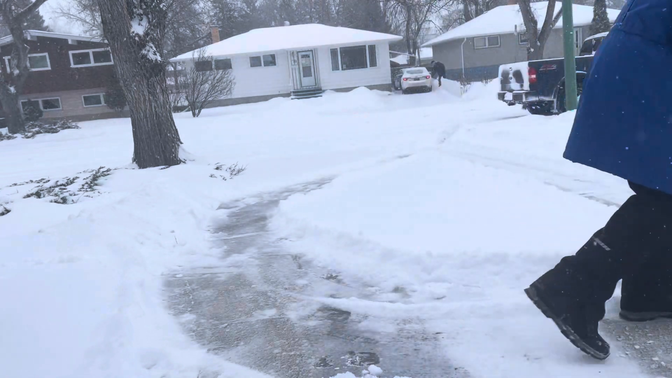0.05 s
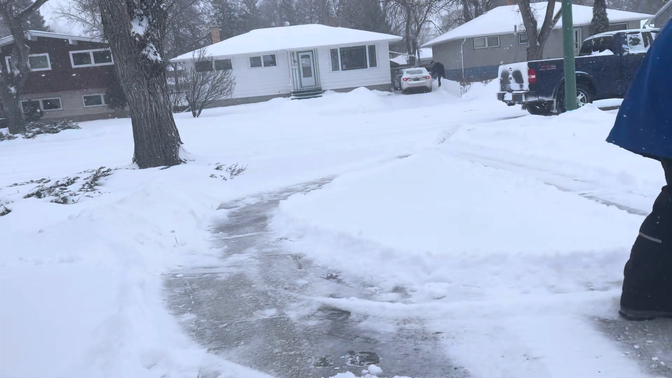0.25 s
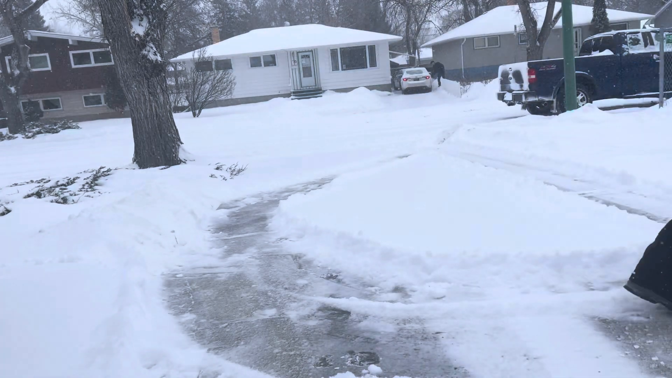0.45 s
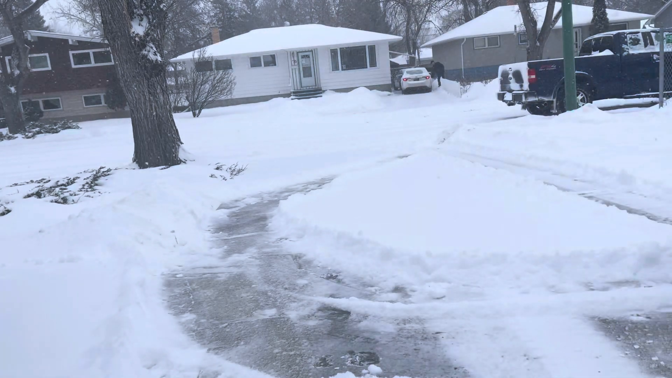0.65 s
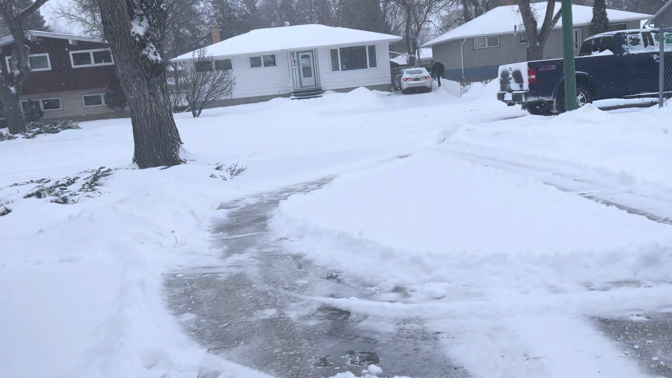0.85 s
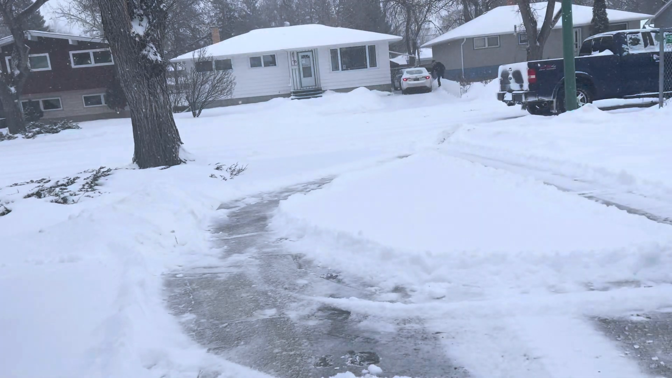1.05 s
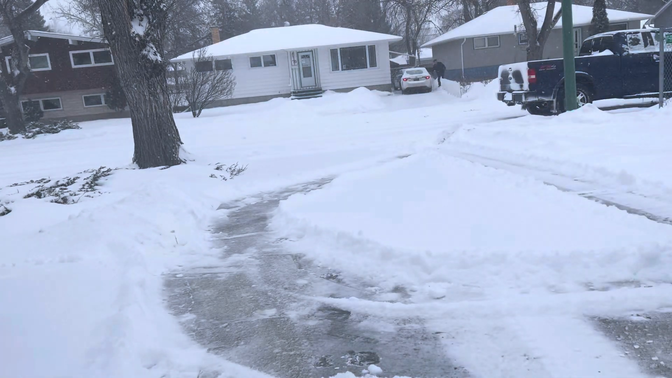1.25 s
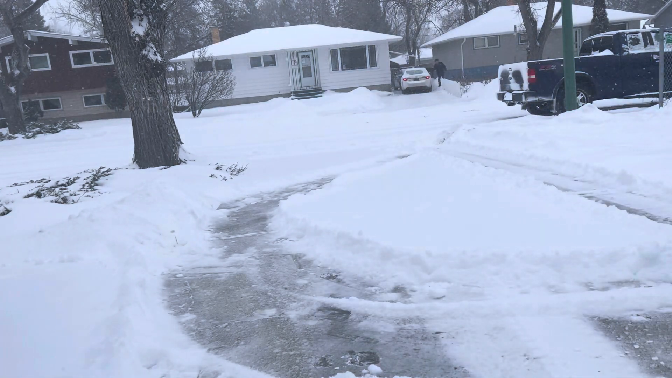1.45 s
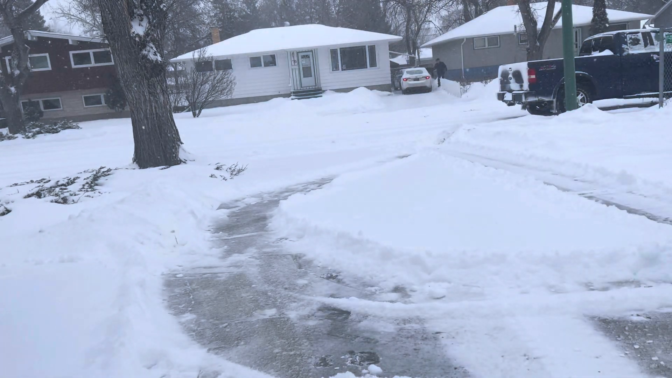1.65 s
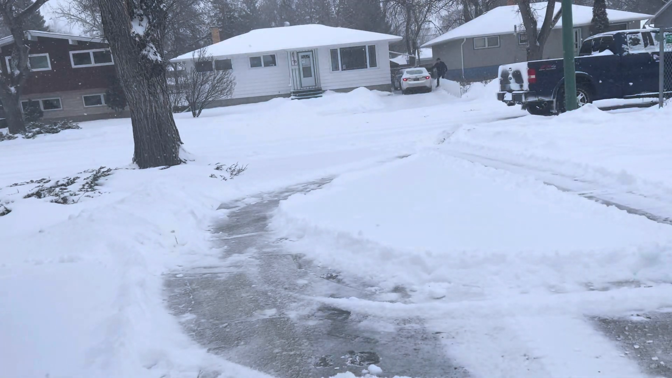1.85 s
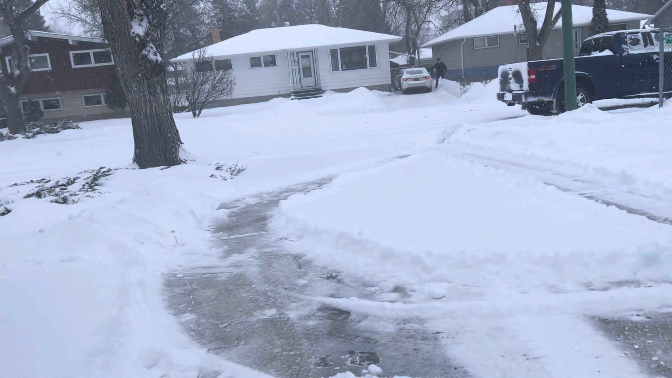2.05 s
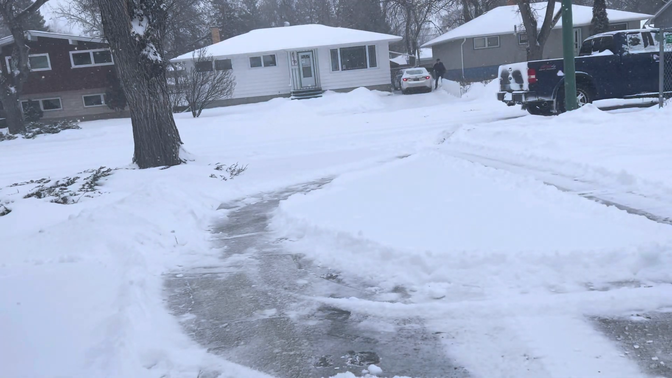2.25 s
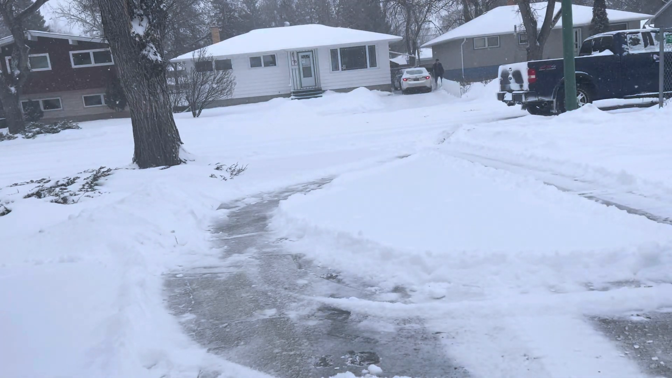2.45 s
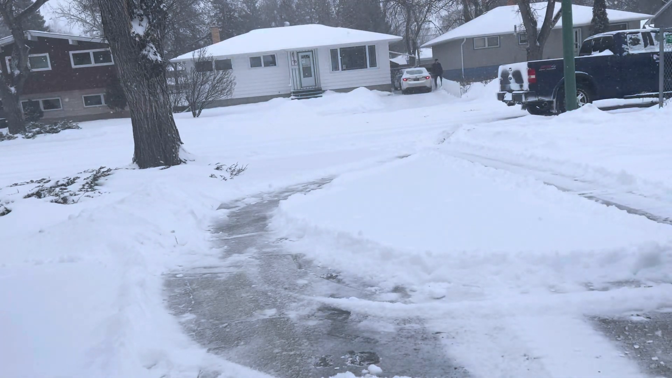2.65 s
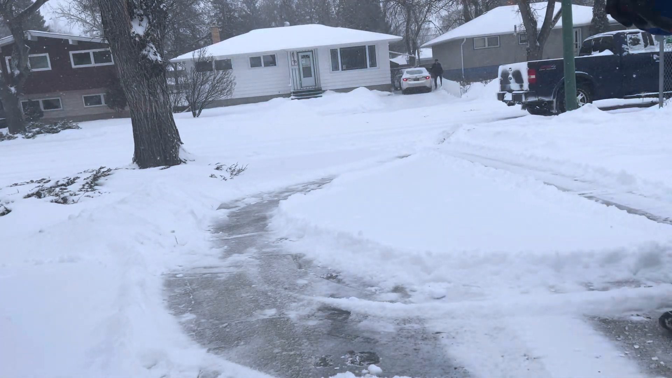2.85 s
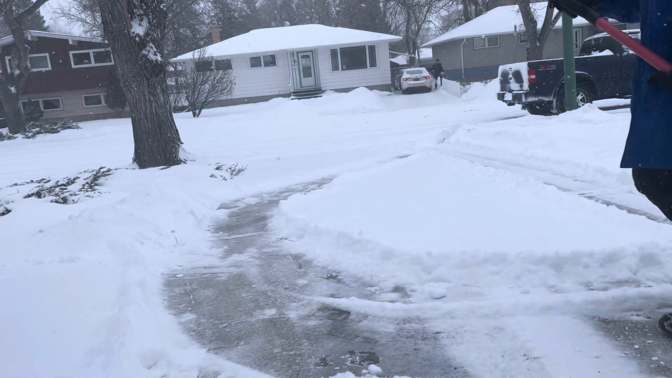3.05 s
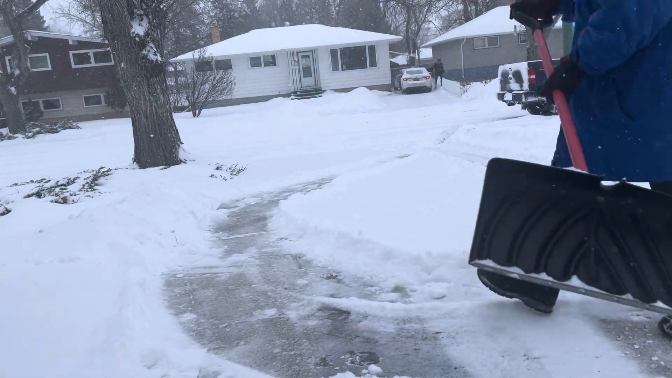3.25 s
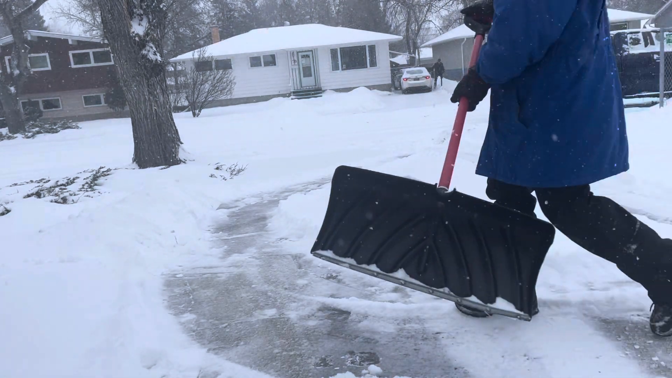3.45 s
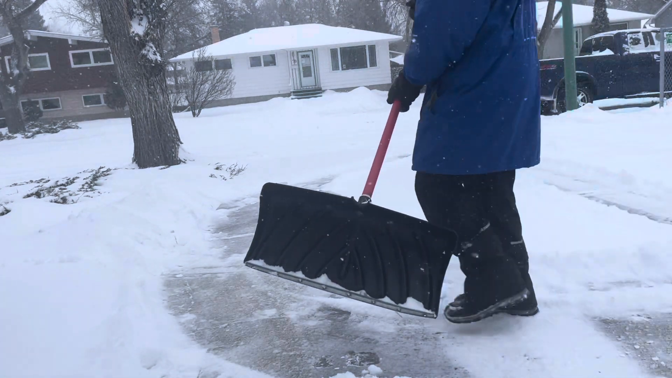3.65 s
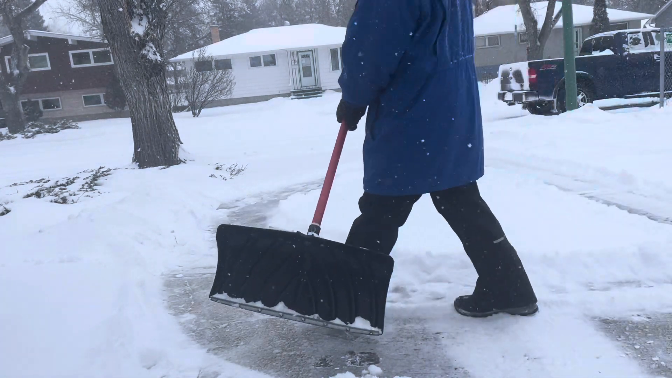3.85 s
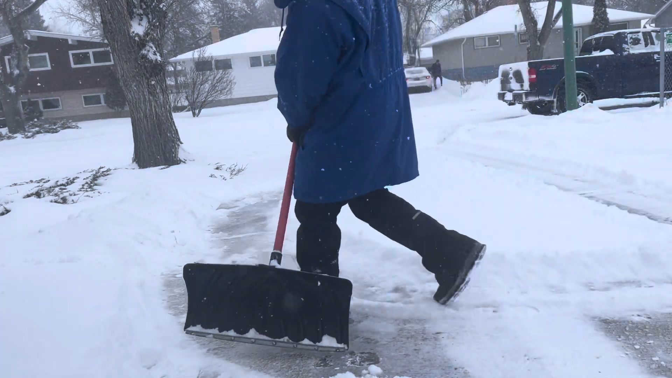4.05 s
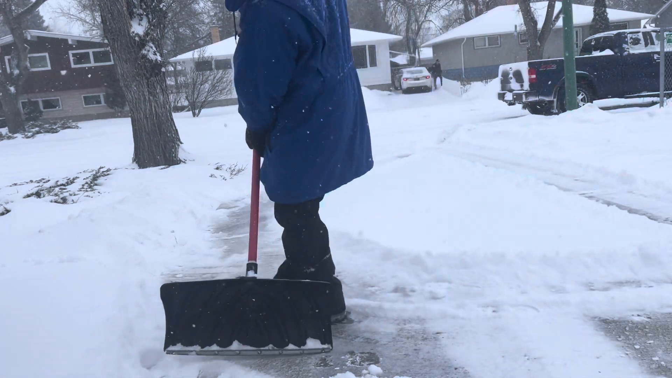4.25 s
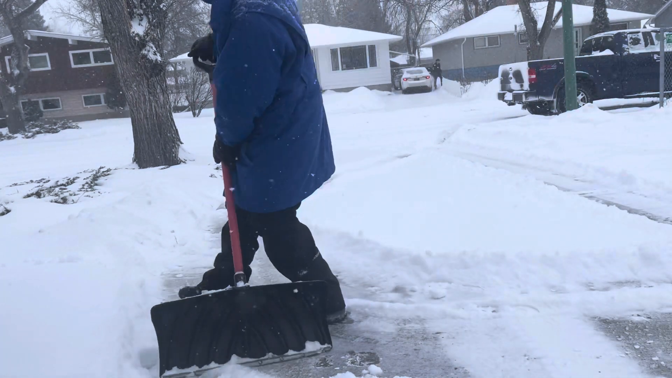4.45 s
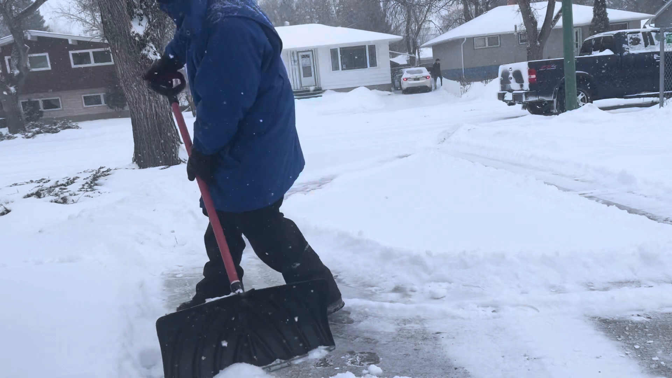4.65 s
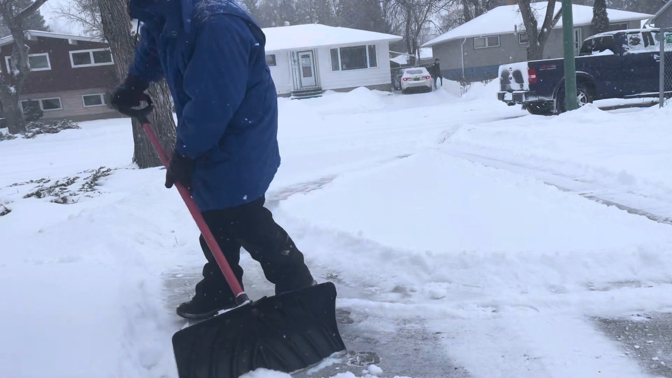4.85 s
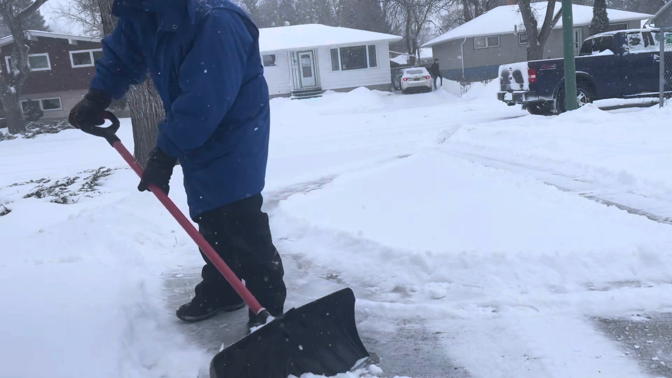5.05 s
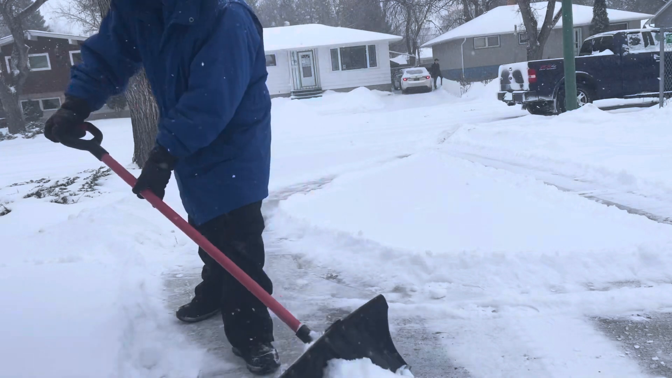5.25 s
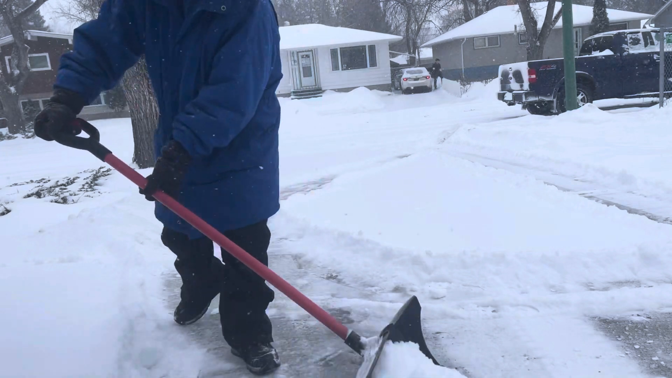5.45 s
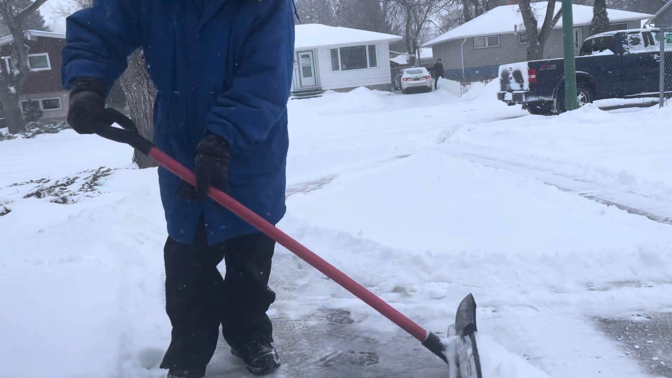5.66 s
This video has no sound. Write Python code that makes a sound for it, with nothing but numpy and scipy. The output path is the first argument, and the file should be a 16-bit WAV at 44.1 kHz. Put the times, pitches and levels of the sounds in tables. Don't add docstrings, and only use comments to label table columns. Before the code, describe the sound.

A snowy residential driveway, outdoors and dry, in close stereo. At the start a shovel edge hisses over grit, catches hard at about 0.33 seconds with a dull knock, and stalls by 0.5. Quiet follows: a truck across the street idles with a low unsteady hum and about 28 small bright ticks a second, over faint air. Boots step and scuff softly near 0.9 to 1.1 seconds, with small snow squeaks. Coat fabric rustles sharply at 2.5 to 2.9, then steps crunch, squeak and creak from 3.1 to 4.0. At 4.4 the blade is set down, bouncing with hollow plastic knocks. From about 4.6 it judders forward in a loud, coarse, rattling scrape, with metallic edge ringing, stone clicks and snapping ice chips, strongest around 4.7 to 5.2. The blade's ringing dulls as snow loads it; scraping eases near 5.4, then swells again with a knock around 5.67 before the cut.

```python
import sys
import numpy as np
from scipy import signal
from scipy.fft import rfft, irfft, next_fast_len
from scipy.io import wavfile
from scipy.ndimage import uniform_filter1d, map_coordinates

SR = 44100
rng = np.random.default_rng(int(sys.argv[2]) if len(sys.argv) > 2 else 0)


def voltage_ratio(decibels):
    exponent = np.asarray(decibels, float) / 20
    return 10 ** exponent


def transcribe(signal):
    frames = np.atleast_2d(signal).T
    limited = np.clip(frames, -1, 1)
    pcm = np.round(limited * 32767).astype(np.int16)
    wavfile.write(sys.argv[1], SR, pcm)


N = 252252
TIME = np.arange(N) / SR

# (t/s, level/dB)
PUSHES = [
    [(0.0, -34.5), (0.272, -36), (0.346, -39.5), (0.48, -40.5), (0.53, -54)],
    [(4.412, -55), (4.47, -54), (4.6, -53.5), (4.726, -43), (4.9, -33), (5.176, -26.5), (5.31, -32),
     (5.45, -37.5), (5.578, -34.5), (5.72, -26.5)],
]
# (f/Hz, level/dB per Hz)
GRIT = [(350, -12), (600, 8), (656, -7), (756, 0.5), (1140, -1.5), (1350, 0), (1720, -4.5), (2050, -4.5),
        (2490, -4.5), (2980, -4), (3570, -10), (4910, -12), (6800, -12), (8300, -7.5), (9400, -7.5),
        (10300, -4), (10800, -4), (11900, -23), (12600, -46), (16700, -65), (22000, -120)]
# (f/Hz, width/Hz, level/dB)
BLADE = [(157, 72, -7), (276.7, 27.3, 5.5), (335.4, 37, 2.5), (434, 93, -1.5), (540, 79, -6.5),
         (764, 74, -7.5), (990, 29, -12)]
# (f/Hz, width/Hz, level/dB)
FAR_BLADE = [(152, 100, 3.5), (272, 91, -2.5), (602, 165, -1)]


def unit(x):
    return x / np.sqrt(np.mean(x ** 2) + 1e-20)


def along(points, hz):
    f, v = np.transpose(points)
    return np.interp(np.log(hz + 1), np.log(f + 1), v)


def gains(rows):
    s, *columns = np.transpose(rows)
    return [voltage_ratio(np.interp(TIME, s, column, -120, -120)) for column in columns]


def wobble(rate):
    coarse = TIME[::8]
    knots = rng.standard_normal(int(N * rate / SR) + 4)
    return np.interp(TIME, coarse, map_coordinates(knots, [coarse * rate]))


def filtered(x, response):
    m = next_fast_len(N + SR // 2)
    return irfft(rfft(x, m) * response(np.fft.rfftfreq(m, 1 / SR)), m)[..., :N]


def hiss(spectrum, grain_db=0., rate=300, patchy_db=0.):
    x = rng.standard_normal(N)
    if grain_db:
        x = x * voltage_ratio(grain_db * wobble(rate))
    if patchy_db:
        z = signal.stft(x, nperseg=256)[2]
        field = uniform_filter1d(rng.standard_normal(z.shape), size=4, axis=0)
        field = uniform_filter1d(field, size=5, axis=1)
        x = signal.istft(z * voltage_ratio(patchy_db * unit(field)), nperseg=256)[1][:N]
    return unit(filtered(x, lambda hz: voltage_ratio(along(spectrum, hz))))


def ring(x, modes):
    def shape(hz):
        total = 0
        for k, (centre, width, db) in enumerate(modes):
            damping = 1j * hz * width
            total = total + (-1) ** k * voltage_ratio(db) * damping / (centre ** 2 - hz ** 2 + damping)
        return total

    return filtered(x, shape) / np.sqrt(np.mean(abs(shape(np.arange(SR // 2))) ** 2))


def bursts(starts, lengths, levels_db, rise=.003, fall=.006):
    out = np.zeros(N)
    for s, length, db in zip(starts, lengths, levels_db):
        t = TIME[int(s * SR):int((s + length + 8 * fall) * SR)] - s
        shape = np.clip(t / rise, 0, 1) * np.exp(-np.maximum(t - length, 0) / fall)
        out[int(s * SR):][:len(t)] += voltage_ratio(db) * shape
    return out


def pings(events, ring_s, crack):
    out, t = np.zeros(N), TIME[:900]
    for s, db, hz in events:
        tone = np.exp(-t / ring_s) * np.sin(2 * np.pi * hz * t)
        ping = tone + crack * np.exp(-2 * t / ring_s) * rng.standard_normal(len(t))
        out[int(s * SR):][:len(t)] += voltage_ratio(db) * ping[:N - int(s * SR)]
    return filtered(out, lambda hz: 1 / (1 + 1j * hz / 5000) ** 2)


def blows(rows, gain_db):
    out = np.zeros(N)
    for s, db, contact in rows:
        push = np.hanning(int(np.clip(contact, .0003, .005) * SR) + 2)
        out[int(s * SR):][:len(push)] += voltage_ratio(db + gain_db) * push / push.sum()
    return out


def shovel(push, bumps, knocks, grit, blade, strip, catch_db, knock_db, chatter_db, strip_db, drag_db,
           fill_from_s, muffle_db):
    slide, = gains(push)
    load_db = -muffle_db * np.clip((TIME - fill_from_s) / 0.44, 0, 1)
    chatter = voltage_ratio(chatter_db * wobble(60))
    s, db, length = np.transpose(bumps)
    catches = bursts(s, np.clip(length, .002, .05), db + catch_db, rise=0.0047, fall=0.0043)
    edge = slide * chatter + catches
    s, db, length = np.transpose(knocks)
    hits = bursts(s, length, db + knock_db, rise=0.0006, fall=0.0049)
    jolts = slide * chatter * voltage_ratio(drag_db + load_db) + voltage_ratio(0.43 * load_db) * hits
    force = rng.standard_normal(N) * voltage_ratio(2.1 * wobble(400))
    stony = rng.standard_normal(N) * voltage_ratio(6 * np.tanh(wobble(300)))
    metal = voltage_ratio(strip_db) * ring(edge * unit(stony), strip)
    scrape = edge * hiss(grit, grain_db=1.5, rate=700, patchy_db=2.5)
    return scrape + metal + ring(jolts * unit(force), blade)


def first_push():
    # (t/s, peak level/dB, length/s)
    far_bumps = [
        (0.321, -18.5, 0.0074),
        (0.333, -14.5, 0.0069),
        (0.345, -27, 0.0055),
        (0.358, -22, 0.0094),
        (0.402, -29, 0.008),
        (0.424, -31, 0.007),
        (0.447, -35, 0.0096),
        (0.482, -27, 0.0083),
    ]
    # (f/Hz, level/dB per Hz)
    far_grit = [(470, -35), (800, -8), (1680, -23), (1870, -6), (2360, -11), (3260, -10.5), (3710, -14),
                (3970, -13), (6400, -12), (8860, -2), (10300, -2), (11300, -14), (12800, -22), (16700, -50),
                (22000, -120)]
    # (f/Hz, width/Hz, level/dB)
    far_strip = [(1850, 250, -2), (3220, 330, -7.5), (4300, 400, -10)]
    # (t/s, peak level/dB, contact/s)
    far_jolts = [
        (.324, -25, 0.0031),
        (.331, -19, 0.0014),
        (.491, -26.5, 0.0015),
    ]
    out = shovel(PUSHES[0], far_bumps, far_bumps, far_grit, FAR_BLADE, far_strip,
                 catch_db=-12.0, knock_db=-17.5, chatter_db=0, strip_db=-12.0, drag_db=-9.5,
                 fill_from_s=0.1, muffle_db=-8.5)
    return out + ring(blows(far_jolts, gain_db=21), FAR_BLADE)


def truck():
    # (t/s, firings so far)
    crank = [(-.162, 0), (1.321, 42), (3.4007, 100), (3.7564, 110), (5.728, 165)]
    # (multiple of the firing rate, level/dB)
    exhaust = [(1, -90), (2, -43.5), (3, -52.5), (4, -51), (5, -65)]
    # (f/Hz, level/dB, unsteadiness/dB)
    drone = [(87.9, -47, 3), (120.8, -56, 5.5)]
    # (t/s, level/dB)
    ticking = [(0, -55), (.6, -45.5), (1.25, -37.5), (2.1, -38), (3, -43.5), (3.9, -38), (5.72, -35.5)]
    # (f/Hz, level/dB)
    tick_modes = [(1300, -2), (1800, 6.5), (2300, 0), (3200, 1), (4400, -2.5), (5300, -4), (6100, 2.5),
                  (6900, -4), (7800, -12), (8600, 7.5), (9500, -1)]
    # (t/s, f/Hz, level/dB)
    glide = [(.55, 6400, -1), (1.05, 6000, -5), (1.3, 4570, -4), (1.8, 4300, -3.5), (2.2, 3640, -18),
             (2.8, 2200, -2), (4, 1900, -8), (5.72, 2000, -4)]
    # (f/Hz, level/dB per Hz)
    rumble = [(12, -19), (20, -35), (59, 0.5), (81, -8.5), (115, -12), (166, -12.5), (334, -54),
              (500, -21.5), (650, -67), (1100, -120)]

    turns = np.interp(TIME, *np.transpose(crank))
    out = np.zeros(N)
    for multiple, db in exhaust:
        level = voltage_ratio(db + 2.0 + 2.0 * wobble(4.69))
        out += level * np.sin(2 * np.pi * multiple * turns + 1.18 * wobble(7.1))
    for hz, db, shake_db in drone:
        level = voltage_ratio(db + 3.5 + shake_db * np.tanh(wobble(5.03)))
        out += level * np.sin(2 * np.pi * hz * TIME + .6 * wobble(4.98))

    since = turns % 1 / np.gradient(turns, TIME)
    firing = turns.astype(int)
    strike = (1 - np.exp(-since / 0.00047)) * (np.exp(-since / 0.0016) + 0.12 * np.exp(-since / 0.017))
    dull, = gains(ticking)
    bright = dull * voltage_ratio(-1.5 + 12.5 * np.exp(-((TIME - 0.83) / 0.43) ** 2))
    for hz, db in tick_modes:
        drift, detune, scatter = rng.standard_normal((3, 170))
        size = voltage_ratio(db - 7 + 4.8 * uniform_filter1d(drift, size=9) + 2.9 * scatter)[firing]
        pitch = hz * (1 + 0.182 * uniform_filter1d(detune, size=15) + 0.027 * scatter)[firing]
        shaded = dull if hz < 4800 else bright
        fade = np.exp(-since * hz / 19)
        out += shaded * size * strike * fade * np.sin(2 * np.pi * pitch * since)

    when, glide_hz, glide_db = np.transpose(glide)
    size, detune = rng.standard_normal((2, 170))[:, firing]
    level = voltage_ratio(np.interp(TIME, when, glide_db) + 4.5 * size)
    pitch = np.interp(TIME, when, glide_hz) * (1 + 0.05 * detune)
    out += dull * level * strike * np.sin(2 * np.pi * pitch * since)
    rattle = hiss([(900, -21), (1600, 4.0), (9500, -2.5), (11500, -27)])
    return out + voltage_ratio(-7.0) * (dull + bright) * strike * rattle + voltage_ratio(-46.5) * hiss(rumble)


def street_air():
    # (f/Hz, level/dB per Hz)
    air = [(120, -17), (200, 5), (343, -9), (739, -3), (910, -9.5), (1990, -16.5), (2500, -25), (3300, -17),
           (7360, -19.5), (8910, -20), (9560, -4), (11400, -24), (12800, -73), (16700, -103), (22000, -120)]
    return voltage_ratio(-55) * hiss(air)


def squeaks():
    # (t/s, length/s, from f/Hz, to f/Hz, level/dB)
    squeak_events = [(2.552, 0.025, 1300, 1700, -53), (2.574, 0.024, 1905, 2100, -37.5),
                     (2.575, 0.03, 3700, 5000, -46), (2.748, 0.085, 1650, 1840, -42),
                     (2.746, 0.11, 2400, 2540, -45.5), (3.12, 0.026, 3400, 3300, -48),
                     (3.663, 0.0315, 1950, 2700, -42), (3.688, 0.033, 2500, 2950, -33.5),
                     (0.945, 0.0706, 2600, 3000, -47), (0.938, 0.036, 2080, 2165, -40.5),
                     (0.939, 0.13, 1250, 1550, -49.5), (1.09, 0.13, 2300, 2050, -50)]
    out = np.zeros(N)
    for s, length, from_hz, to_hz, db in squeak_events:
        t = np.arange(int(length * SR)) / SR
        pitch = from_hz + (to_hz - from_hz) * t / length + 1200 * rng.standard_normal(len(t))
        phase = 2 * np.pi * np.cumsum(pitch) / SR
        tone = np.sin(phase) + .25 * np.sin(2 * phase)
        out[int(s * SR):][:len(t)] += voltage_ratio(db) * np.sin(np.pi * t / length) * tone
    return out


def walker():
    # (t/s, length/s, level/dB)
    swishes = [
        (.5, 0.065, -57),
        (1.008, .17, -52),
        (1.473, 0.23, -55.5),
        (2.534, 0.063, -41.5),
        (2.742, 0.088, -40),
        (2.845, 0.066, -46),
        (3.112, 0.032, -44),
        (3.29, 0.18, -52.5),
        (3.658, 0.051, -45.5),
        (3.99, 0.054, -50.5),
    ]
    # (t/s, length/s, level/dB)
    crunches = [
        (0.55, 0.12, -59),
        (0.9, 0.076, -57),
        (1.408, .08, -72),
        (2.2, 0.13, -58),
        (3.36, 0.14, -51),
        (3.398, 0.067, -47),
        (3.674, 0.04, -42.5),
        (3.745, 0.31, -53),
        (3.979, 0.061, -46),
        (4.255, 0.099, -61),
    ]
    # (t/s, length/s, level/dB)
    scuffs = [
        (0.909, 0.12, -50),
        (1.055, 0.11, -51.5),
        (1.404, 0.084, -65),
        (3.14, 0.055, -62),
        (3.872, 0.2, -57),
    ]
    # (t/s, length/s, level/dB)
    treads = [
        (4, 0.033, -58),
        (3.41, .065, -43.5),
        (3.3, 0.025, -56),
        (2.2, 0.054, -70),
        (4.365, 0.015, -47),
    ]
    # (t/s, peak level/dB, f/Hz)
    creaks = [(0.331, -23, 1900), (0.349, -26, 2000), (0.645, -36.5, 1370), (0.791, -34, 740),
              (1.04, -40, 1520), (1.214, -34, 2110), (3.371, -37, 700), (3.567, -37.5, 1850),
              (3.771, -29.5, 1650), (3.804, -32, 1240), (3.847, -27, 940), (3.878, -23.5, 454),
              (3.897, -28.5, 1150), (3.915, -29.5, 1260), (3.96, -26.5, 1230), (4.022, -29, 1240)]
    # (f/Hz, level/dB per Hz)
    cloth = [(410, -60), (700, -12.5), (1140, -24), (1640, -2.5), (2450, -10.5), (2770, -11), (3210, -10),
             (7430, -12), (9140, 0), (11100, -5), (12200, -26), (12800, -60), (16700, -55), (22000, -120)]
    snow = [(150, 4.5), (320, 6.5), (480, 0), (620, -7.5), (800, -2), (1200, -10.5), (2500, -8),
            (5000, -39)]
    # (f/Hz, width/Hz, level/dB)
    sole = [(720, 330, -1.5), (1524, 83, 4), (2013, 84, 5.5), (3000, 170, 1.5)]
    crust = [(427, 80, 4), (850, 120, -8.5)]

    def moves(stir_db, events):
        stir = voltage_ratio(stir_db + 2.5 * wobble(5.79))
        return stir + bursts(*np.transpose(events), rise=0.013, fall=0.0074)

    out = moves(-57.5, swishes) * hiss(cloth, grain_db=1.5, patchy_db=2.5)
    out += moves(-61.5, crunches) * hiss(snow, grain_db=2., rate=120)
    rubbing = unit(rng.standard_normal(N) * voltage_ratio(3.5 * wobble(90)))
    out += ring(moves(-61.5, scuffs) * rubbing, sole)
    packing = unit(rng.standard_normal(N) * voltage_ratio(5.4 * wobble(150)))
    out += ring(bursts(*np.transpose(treads), rise=0.0063, fall=0.0072) * packing, crust)
    return out + squeaks() + pings(creaks, ring_s=0.0017, crack=0.12)


def ice_chips():
    # (t/s, peak level/dB, f/Hz)
    chips = [(4.4018, -32, 1620), (4.6516, -23, 1420), (4.687, -8, 1690), (4.6925, -15, 1550),
             (4.7732, -16, 3100), (4.794, -20, 1450), (4.813, -20, 1450), (4.867, -24, 1200),
             (4.924, -17, 1440), (4.999, -9, 1350), (5.029, -16, 3000), (5.045, -20, 1340),
             (5.0774, -17, 2080), (5.1529, -10, 1330), (5.166, -7, 2080), (5.1774, -14, 1400),
             (5.2042, -11, 1370), (5.229, -15, 1900), (5.253, -22, 1280), (5.3276, -17, 1290),
             (5.3574, -29, 1530), (5.479, -25, 1500), (5.5142, -17, 2010), (5.5565, -19, 1610),
             (5.5744, -13, 1670), (5.632, -12, 1300), (5.649, -12, 1520)]
    return voltage_ratio(-6) * pings(chips, ring_s=0.0035, crack=1.0)


def second_push():
    # (t/s, peak level/dB, length/s)
    bump_events = [(4.617, -42, 0.0079), (4.626, -11, 0.0045), (4.6505, -14, 0.02), (4.675, -5, 0.025),
                   (4.712, -7.5, 0.012), (4.755, -13.5, 0.024), (4.7845, -5, 0.019), (4.809, -6.5, 0.014),
                   (4.83, -1, 0.0089), (4.859, -11, 0.042), (4.923, -11, 0.021), (4.959, -9.5, 0.018),
                   (4.989, -11, 0.021), (5.023, -9, 0.028), (5.059, -4.5, 0.021), (5.104, -6.5, 0.012),
                   (5.14, -11, 0.017), (5.16, -8.5, 0.027), (5.216, -19, 0.027), (5.245, -12.5, 0.023),
                   (5.268, -13, 0.014), (5.285, -15.5, 0.013), (5.346, -14.5, 0.018), (5.392, -21, 0.008),
                   (5.401, -11.5, 0.0079), (5.413, -12, 0.008), (5.508, -23, 0.044), (5.551, -18.5, 0.052),
                   (5.603, -11, 0.03), (5.642, -18, 0.013), (5.667, -19, 0.012), (5.694, -36, 0.016)]
    # (t/s, peak level/dB, length/s)
    knock_events = [(4.599, -25, 0.015), (4.655, -11, 0.015), (4.678, -10, 0.022), (4.701, -13, 0.019),
                    (4.753, -15, 0.015), (4.772, -9, 0.014), (4.823, -5.5, 0.017), (4.866, -12, 0.017),
                    (4.9, -17, 0.014), (4.935, -17, 0.011), (4.98, -27, 0.012), (5.013, -13, 0.012),
                    (5.038, -11, 0.011), (5.102, -20, 0.012), (5.166, -23, 0.012), (5.168, -21, 0.011),
                    (5.245, -9, 0.013), (5.354, -9, 0.016), (5.402, -21, 0.012), (5.46, -23, 0.013),
                    (5.518, -12, 0.011), (5.58, -16, 0.012), (5.607, -13, 0.0085), (5.667, -20, 0.01),
                    (5.657, -6, 0.0078)]
    # (f/Hz, width/Hz, level/dB)
    near_strip = [(1440, 340, -1), (1680, 33, -7), (2010, 96, -8), (2990, 310, -2), (4220, 600, -10),
                  (8500, 400, -4), (9680, 490, -0.5)]
    return shovel(PUSHES[1], bump_events, knock_events, GRIT, BLADE, near_strip,
                  catch_db=-17, knock_db=-13, chatter_db=1.8, strip_db=-3.0, drag_db=12,
                  fill_from_s=4.733, muffle_db=14.5)


def bounces():
    # (t/s, peak level/dB, crack level/dB,
    # contact/s)
    cracking_blows = [(4.416, -15.5, -15, 0.0022), (4.443, -22, -6.5, 0.0023), (4.463, -22, -27, 0.0017),
                      (4.48, -9, -10, 0.00024), (4.486, -13, -25, 0.001), (4.496, -10.5, -36, 0.002),
                      (4.538, -5.5, -8.5, 0.0012), (4.546, -7, -7.5, 0.00073), (4.573, -12.5, -25, 0.0027),
                      (4.609, -19.5, -21, 0.0014), (4.706, -4.5, -9, 0.0019), (5.674, -10, -2, 0.0017)]
    # (t/s, peak level/dB, contact/s)
    hops = [(4.656, -16, 0.0015), (4.667, -14, 0.0017), (4.68, -16, 0.0015), (4.68, -12.5, 0.0015),
            (4.719, -11, 0.0019), (4.727, -10, 0.0014), (4.761, -11, 0.0017), (4.776, -7, 0.0015),
            (4.786, -11, 0.0015), (4.796, -14, 0.0013), (4.822, -11, 0.0012), (4.835, -8, 0.00094),
            (4.867, -14, 0.0015), (4.877, -12, 0.0014), (4.888, -12, 0.0013), (4.908, -10, 0.0012),
            (4.928, -10, 0.0013), (4.937, -14, 0.0015), (4.949, -19, 0.0015), (4.973, -18, 0.0015),
            (5.011, -23, 0.0015), (5.024, -23, 0.0015), (5.038, -14, 0.0015), (5.054, -12.5, 0.0015),
            (5.067, -19, 0.0013), (5.076, -10.5, 0.0014), (5.111, -19, 0.0017), (5.125, -18, 0.0015),
            (5.168, -20, 0.0016), (5.177, -21, 0.0017), (5.204, -22, 0.0015), (5.244, -14, 0.0014),
            (5.253, -14.5, 0.0017), (5.262, -19, 0.0021), (5.28, -18, 0.002), (5.349, -23, 0.002),
            (5.35, -16, 0.0023), (5.411, -19, 0.0017), (5.533, -18, 0.0017), (5.541, -17, 0.0016),
            (5.606, -15, 0.0013), (5.617, -22, 0.0016), (5.631, -15, 0.00071), (5.661, -11, 0.0017),
            (5.704, -22, 0.0015)]
    s, db, crack_db, contact = np.transpose(cracking_blows)
    cracks = bursts(s, 0 * s + 0.001, db + crack_db - 11, rise=0.0004, fall=0.0062) * hiss(GRIT)
    force = blows(zip(s, db, contact), gain_db=19.5) + blows(hops, gain_db=16)
    return ring(force, BLADE) + cracks


def stone_strikes():
    # (t/s, peak level/dB, f/Hz)
    stones = [(4.4174, -21.5, 1130), (4.4764, -21, 890), (4.5087, -22.5, 1750), (4.6109, -28, 1340),
              (4.6299, -33, 1090), (4.6768, -16, 1670), (4.7147, -11, 1550), (4.7596, -24, 990),
              (4.8329, -29, 930), (4.9666, -10, 3050), (5.0639, -10, 3000), (5.1153, -12, 2070),
              (5.1442, -23, 1310), (5.2769, -6, 3220), (5.3477, -13, 1610), (5.4026, -13, 1110),
              (5.4174, -16, 1340), (5.5353, -18, 1000), (5.6062, -6, 1280), (5.6564, -13, 2760),
              (5.669, -8, 1540), (5.6764, -10.5, 1620), (5.7054, -7.5, 1080)]
    return voltage_ratio(-4.0) * pings(stones, ring_s=0.0027, crack=1.0)


def flecks(push):
    count = 90
    when, db = np.transpose(push)
    s = rng.uniform(when[2], when[-1], count)
    size, pitch = rng.exponential(size=count), rng.standard_normal(count)
    level_db = np.interp(s, when, db) + 1.5 + 4 * np.minimum(size, 2)
    hz = 3200 * np.exp(0.294 * pitch)
    return pings(zip(s, level_db, hz), ring_s=0.0014, crack=0.18)


def ports(x, place):
    # (f/Hz, likeness)
    alike = [(100, .995), (500, .96), (1500, .88), (2300, .76), (3000, .85), (5000, .66), (8500, .9),
             (10500, .93)]
    # (f/Hz, lead/rad)
    low_lead = [(20, -0.3), (90, -0.28), (200, -0.15), (300, -0.02)]
    high_lead = [(5430, 1.0), (6700, -0.15), (7500, 1.2), (8700, -0.4), (9600, -2.4), (10900, -3.6),
                 (11700, -6.2), (12600, -6.4)]
    balance, lead = place
    z = signal.stft(x, nperseg=128)[2]
    scrambled = z * np.exp(2j * np.pi * rng.random(z.shape))
    other = np.sqrt(2) * signal.istft(scrambled, nperseg=128)[1][:N]

    def spread(hz):
        turn = np.arccos(along(alike, hz)) / 2
        return np.array([np.cos(turn), np.sin(turn)])

    def left_right(hz):
        phase = np.interp(hz, *np.transpose(low_lead + lead + high_lead))
        half = voltage_ratio(along(balance, hz) / 2) * np.exp(.5j * phase)
        return np.array([half, 1 / half])

    mid, side = filtered(np.array([x, other]), spread)
    return filtered(np.array([mid + side, mid - side]), left_right)


def scene():
    # (f/Hz, lead/rad)
    sideways = [
        [(60, 2.0), (200, 0.5), (350, -1.5), (640, 0.5), (1160, -2.0), (2100, 1.5), (5000, 2.5), (12400, 0.0)],
        [(600, -0.1), (860, 3.3), (1210, -1.3), (2330, -0.1), (2840, 1.8), (4130, -0.2)],
    ]
    near = [
        [(60, 1.5), (310, 0.5), (700, -1.0), (1600, 2.5), (2400, 5.0), (4500, 6.3), (8230, 1.0), (12400, 0.0)],
        [(950, 0.9), (1720, 0.5), (2580, 1.7), (4390, 0.6)],
    ]
    far = [
        [(60, 1.5), (200, 1.0), (350, -1.0), (1160, -1.0), (2100, 3.0), (3790, 5.0), (6860, 2.0), (12400, 0.0)],
        [(430, -0.1), (690, 0.1), (2070, -0.8), (3010, 2.0), (3790, 0.9)],
    ]
    first = first_push()
    street = truck() + street_air() + walker()
    second = ice_chips() + second_push() + bounces() + stone_strikes() + flecks(PUSHES[1])
    return ports(first, sideways) + ports(street, far) + ports(second, near)


def low_pass(x):
    return signal.sosfilt(signal.butter(12, 13000, fs=SR, output="sos"), x)


def record(dry):
    dry = filtered(dry, lambda hz: 1 - .93 * np.exp(-((hz - 10300) / 200) ** 2))
    masker = uniform_filter1d(np.mean(dry ** 2, axis=0), size=1000)
    kept = dry
    for low, high in [(10000, 10600), (10600, 11500), (11500, 12450), (12450, 20000)]:
        top = filtered(dry, lambda hz: (hz > low) & (hz <= high))
        level = uniform_filter1d(np.mean(top ** 2, axis=0), size=1000)
        limit = voltage_ratio(3 * wobble(18)) ** 2 * (voltage_ratio(-67) ** 2 + voltage_ratio(-32) ** 2 * masker)
        weak = level < limit
        kept = kept - uniform_filter1d(1. * weak, size=300) * top
    return low_pass(kept)


dry = scene()
out = record(dry)
transcribe(out)
```